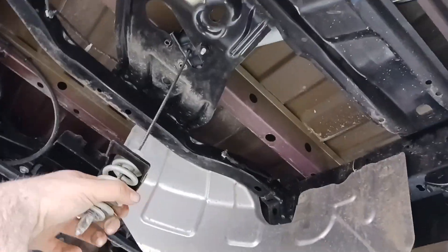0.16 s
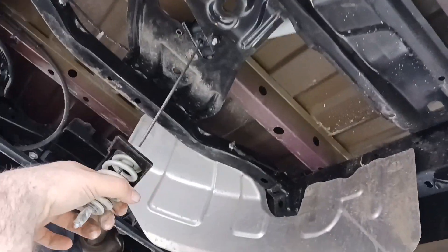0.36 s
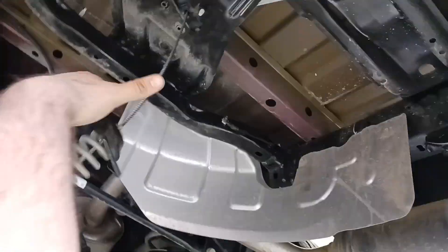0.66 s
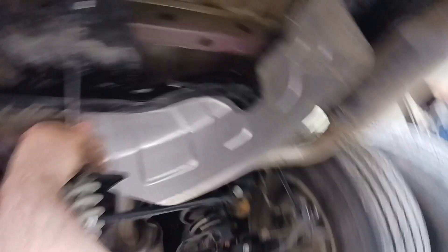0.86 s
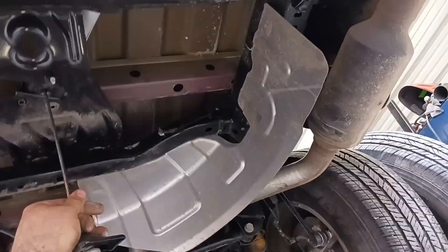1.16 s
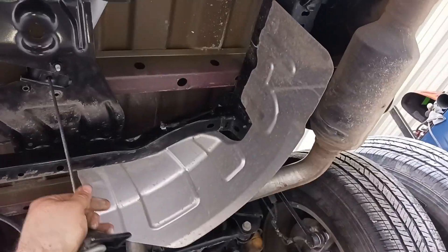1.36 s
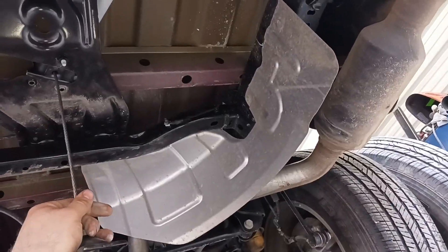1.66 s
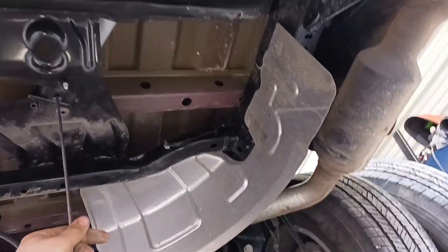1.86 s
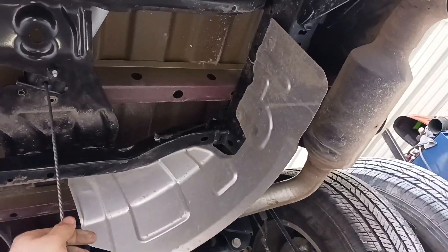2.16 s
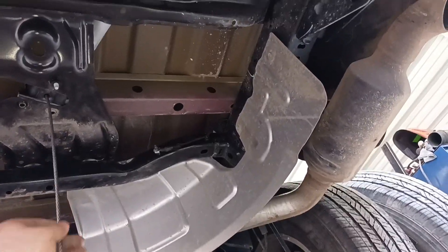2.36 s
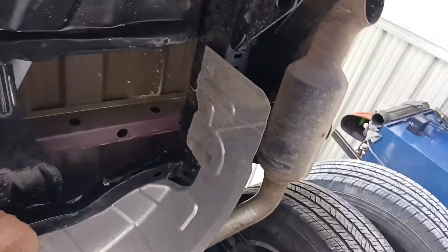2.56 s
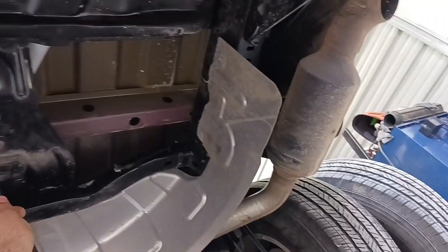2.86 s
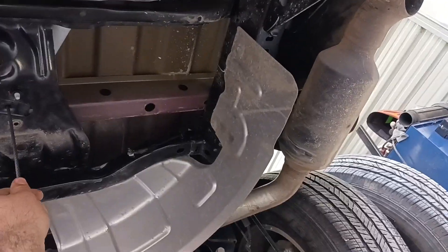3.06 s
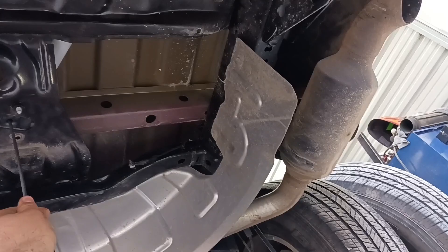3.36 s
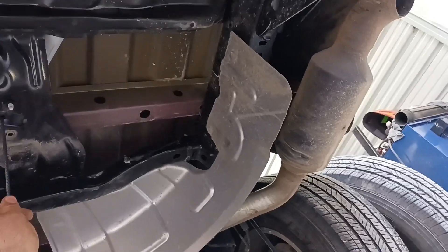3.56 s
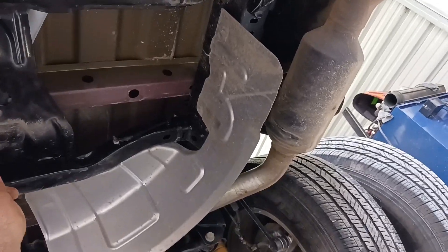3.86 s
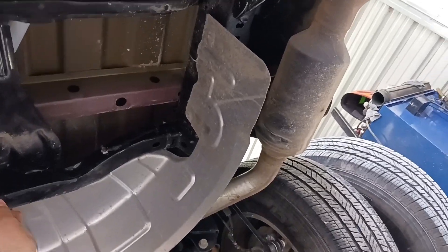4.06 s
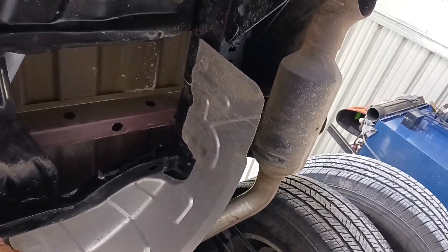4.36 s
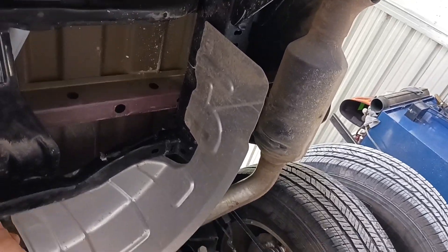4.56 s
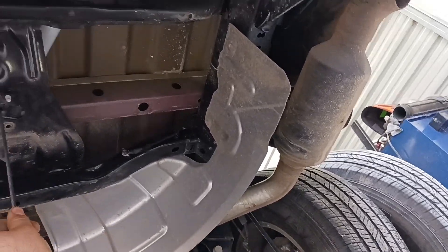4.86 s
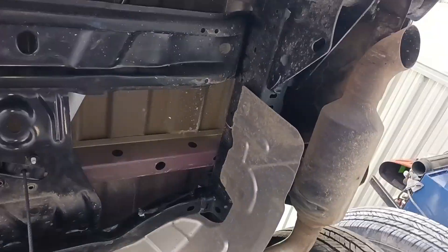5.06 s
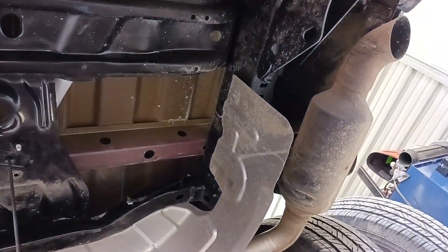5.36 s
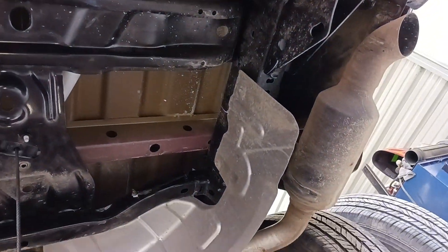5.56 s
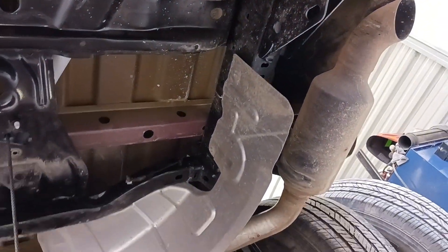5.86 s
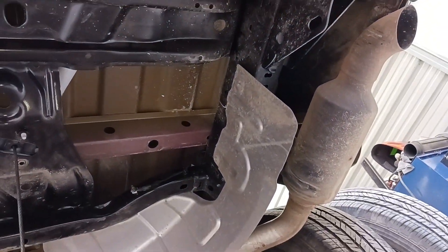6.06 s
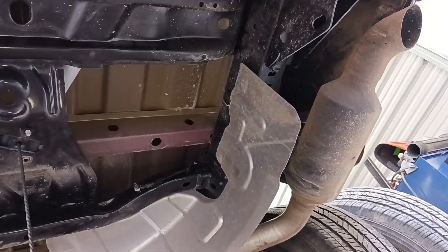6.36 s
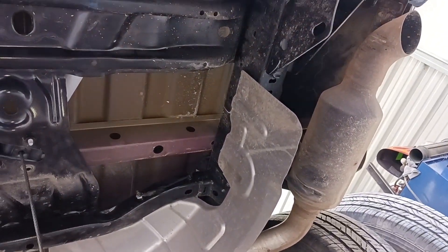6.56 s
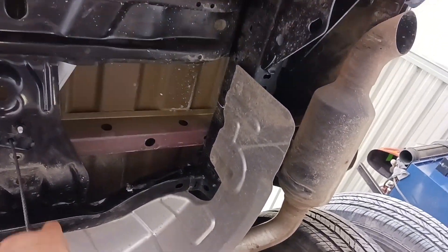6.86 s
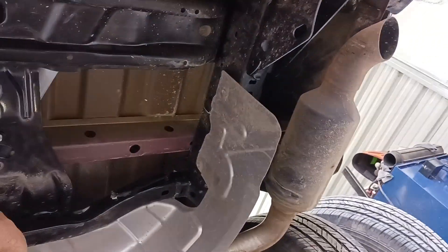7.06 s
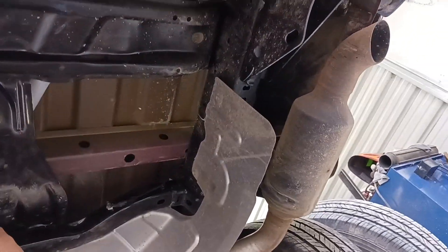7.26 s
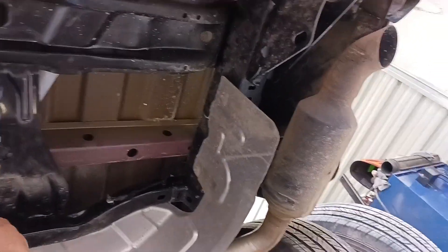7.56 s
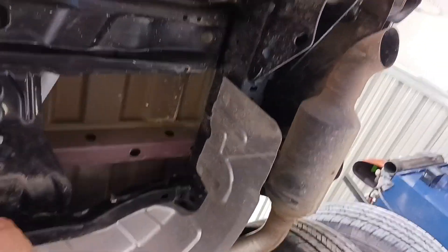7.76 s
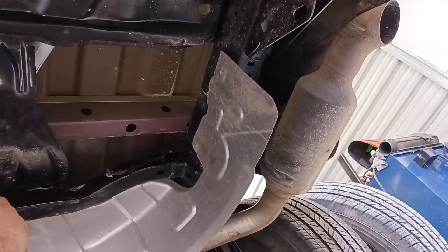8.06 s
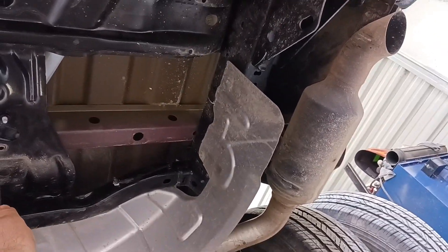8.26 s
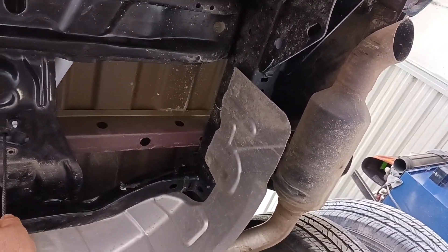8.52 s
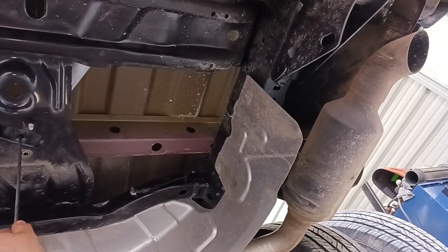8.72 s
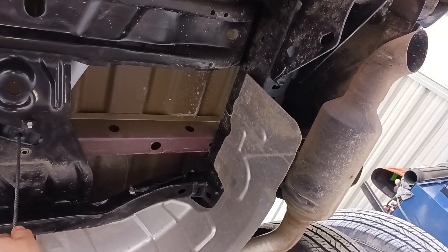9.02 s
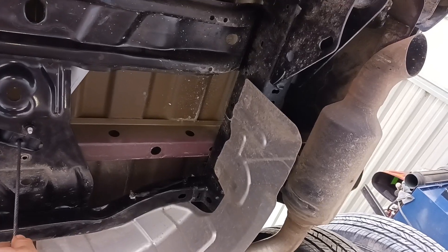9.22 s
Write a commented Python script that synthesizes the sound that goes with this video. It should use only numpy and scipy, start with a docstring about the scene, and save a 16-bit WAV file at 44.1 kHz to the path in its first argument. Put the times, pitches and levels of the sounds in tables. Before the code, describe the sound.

A steel carrier on a cable knocks and chatters under a truck, dense at first then sparser, with a spring ping and a car passing nearby.

```python
"""Cable and steel carrier under a truck bed

A hand tugs the cable of a spare tire winch: its steel carrier knocks and chatters on the frame (noise
bursts through resonators), the truck body booms and the spring pings (decaying sines). The hand rubs
the cable, soft swishes of treble pass and air puffs on one microphone (shaped noise and a pulse).
A car passes on a road nearby (firing tone and noise). A phone listens close by with two microphones."""
import sys
import numpy as np
from scipy import signal
from scipy.fft import rfft, irfft, next_fast_len
from scipy.io import wavfile
from scipy.ndimage import uniform_filter1d, map_coordinates

SR = 44100
rng = np.random.default_rng(int(sys.argv[2]) if len(sys.argv) > 2 else 0)


def file_out(sig):
    """Save sig as 16-bit WAV at sys.argv[1]."""
    # one column per channel
    cols = np.atleast_2d(sig).T
    # limit, then scale
    lim = np.clip(cols, -1, 1)
    pcm = np.round(lim * 32767).astype(np.int16)
    wavfile.write(sys.argv[1], SR, pcm)


N = 414099

# Knocks of the carrier; each layer scales the rise and decay times:
# start_s, thud_db, clank_over_thud_db, rattle_over_thud_db, rise_s, t60_s
KNOCKS = [(0.038, -43.5, -2.5, -13, 0.035, 0.33), (0.101, -35.5, -1.5, -8, 0.004, 0.25),
          (0.148, -43.0, 7, 3.5, 0.0049, 0.078), (0.202, -48.5, 12, 1, 0.011, 0.15),
          (0.262, -42, 3.5, 0, 0.013, 0.1), (0.286, -34.5, 1, -11.5, 0.033, 0.099),
          (0.35, -34.5, -2.0, -18, 0.007, 0.12), (0.414, -45.5, 1.5, -8, 0.0165, 0.13),
          (0.483, -39.5, 5.5, -2.5, 0.013, 0.11), (0.621, -48.5, 8, 12, 0.011, 0.09),
          (0.677, -38.5, -4.5, 9.5, 0.007, 0.076), (0.971, -30.5, -1, -12.5, 0.014, 0.17),
          (1.002, -26, -4, -6.5, 0.0049, 0.15), (1.044, -28.5, -6.5, -5, 0.0066, 0.2),
          (1.071, -32, -9.5, -9, 0.008, 0.25), (1.138, -32.5, -14.5, -18, 0.061, 0.16),
          (1.179, -26.5, 0.5, -9, 0.019, 0.18), (1.224, -20, -3.5, -0.5, 0.019, 0.14),
          (1.315, -35.5, -1, -15, 0.0025, 0.18), (1.371, -31.5, -1, -2, 0.013, 0.09),
          (1.399, -38.5, -4.5, -17.5, 0.027, 0.2), (1.461, -34, -7, -38, 0.012, 0.11),
          (1.531, -26.5, -4, -19.5, 0.04, 0.18), (1.592, -26, -1, -8, 0.025, 0.26),
          (1.672, -24, -14, -35.0, 0.0098, 0.079), (1.712, -29.5, -9, -20.5, 0.013, 0.31),
          (1.789, -39, -6.5, -19, 0.013, 0.15), (1.949, -20.5, -8.5, -10.0, 0.0087, 0.12),
          (1.994, -27, -3.5, -15, 0.012, 0.13), (2.084, -37, -5.0, -11.5, 0.0098, 0.4),
          (2.184, -29.5, -6.5, -16.5, 0.032, 0.13), (2.344, -42.0, -15, -26, 0.012, 0.17),
          (2.392, -26, -3, -10.5, 0.0078, 0.23), (2.411, -21.0, -2, -1, 0.013, 0.13),
          (2.597, -45.5, -14, -27, 0.019, 0.23), (2.772, -28, -4.5, -7, 0.01, 0.14),
          (3.02, -25, -3, -15, 0.023, 0.28), (3.343, -33, -0.5, -10, 0.0188, 0.26),
          (3.719, -34.5, -7.5, -26, 0.025, 0.18), (3.787, -35.5, -5, -21, 0.012, 0.16),
          (3.945, -33.5, -3, -25, 0.018, 0.14), (3.997, -37.0, -20, -27, 0.032, 0.22),
          (4.111, -35.5, -13, -30, 0.035, 0.17), (4.196, -28, -10, -19, 0.022, 0.1),
          (4.257, -37.5, -10.5, -37, 0.01, 0.19), (4.319, -32.5, -9, -25.0, 0.027, 0.15),
          (4.459, -48, -15, -37, 0.01, 0.19), (4.512, -30.5, -13.0, -32.0, 0.042, 0.12),
          (4.598, -36.5, -20, -47, 0.0061, 0.24), (4.701, -43.5, -0.5, -9.5, 0.019, 0.12),
          (4.738, -38.5, -3, -17.5, 0.038, 0.18), (4.842, -45.5, 2, -16.5, 0.0096, 0.16),
          (5.044, -45.5, -2.0, -6, 0.031, 0.21), (5.191, -36.5, -3, -23, 0.013, 0.13),
          (5.262, -39.5, -6.0, -17, 0.024, 0.22), (5.296, -37.5, -10, -26, 0.0206, 0.25),
          (5.337, -28, -3.0, -13, 0.0145, 0.15), (5.432, -39, -13.5, -45.5, 0.0063, 0.088),
          (5.541, -33.5, -7, -17, 0.027, 0.13), (5.577, -40.5, -3, -11, 0.004, 0.38),
          (5.622, -39, 3.5, -11, 0.0084, 0.1), (5.705, -37, -10.5, -34, 0.01235, 0.12),
          (5.779, -48.5, -0.5, -23, 0.0079, 0.22), (5.821, -36, -4, -15, 0.028, 0.12),
          (5.939, -34, -3, -15, 0.025, 0.17), (6.06, -37.5, -5, -25, 0.025, 0.17),
          (6.112, -38.5, -1.5, -16, 0.0121, 0.19), (6.266, -46.5, -15.5, -36, 0.026, 0.66),
          (6.336, -31, 4, -5.5, 0.0087, 0.12), (6.363, -25, -7, -27, 0.0019, 0.22),
          (6.389, -35.5, -2.0, -11.5, 0.0032, 0.19), (6.501, -53.5, -3.5, -44, 0.0089, 0.14),
          (6.574, -36.5, -5.5, -22.5, 0.0305, 0.14), (6.659, -29, -8, -17, 0.0104, 0.13),
          (7.016, -49.5, -21, -28, 0.0366, 0.12), (7.063, -34, -0.5, -14.5, 0.025, 0.13),
          (7.259, -41, -4, -19.5, 0.0234, 0.1), (7.491, -34, -19.5, -44, 0.0145, 0.087),
          (7.725, -35.5, -5.5, -17.5, 0.0177, 0.1), (7.798, -36.5, -13, -29, 0.027, 0.28),
          (7.853, -33.5, -4.5, -20, 0.00292, 0.15), (7.941, -36, -7.5, -18.5, 0.013, 0.17),
          (8.013, -43, -11.5, -29, 0.0081, 0.057), (8.102, -33.5, -7, -21.5, 0.035, 0.09),
          (8.165, -35, 6, 3.5, 0.015, 0.12), (8.313, -46.5, -10.5, -13, 0.036, 0.13),
          (8.358, -42.5, -10.0, -17, 0.04, 0.15), (8.425, -46.5, -17, -37, 0.014, 0.17),
          (8.656, -39.5, -7.5, -14, 0.017, 0.12), (8.7, -41.5, 0, -5, 0.01, 0.25),
          (8.771, -29, 1, -12.5, 0.025, 0.15), (8.96, -47, -2.5, -21, 0.0221, 0.14),
          (9.004, -35.0, -2.5, -7.5, 0.012, 0.11), (9.211, -39, -4, -13, 0.0193, 0.15),
          (9.245, -41, -6, -18.5, 0.0049, 0.13), (9.312, -46.5, -2, -6, 0.044, 0.14),
          (9.344, -32.0, -7, -21, 0.035, 0.092)]
# Resonances of frame and bed floor: centre_hz, width_hz, level_db
FRAME_MODES = [(78, 23, -8), (122, 26.2, -0.5), (165, 32.2, -1.5), (222.9, 22, -1), (261.3, 26, -4),
               (377.8, 42.4, -11.5)]
# Resonances of the heat shield: centre_hz, width_hz, level_db
SHIELD_MODES = [(437.6, 50.7, 8), (518.7, 93, 4), (632, 43, 5), (722, 64, 1), (846.4, 37.5, 4.5),
                (1020, 99, -1), (1204, 54.5, 2), (1401, 122, -1.5), (1647, 210, -4.5), (1990, 240, -5),
                (2550, 320, -9.5)]
# Resonances of small loose parts: centre_hz, width_hz, level_db
PARTS_MODES = [(2967, 566, 2), (4050, 2200, -3.5), (5700, 820, -2), (6294, 710, -8.5), (7400, 550, -14)]
# Resonances of the finest grit: centre_hz, width_hz, level_db
GRIT_MODES = [(10300, 500, -6.5), (12400, 1200, -1), (14600, 1600, 0)]
# Spring pings: start_s, short_modes_db, long_modes_db, attack_s
PINGS = [(.619, -33, -32.5, 0.0096), (.678, -15.5, -25.5, 0.0035), (.715, -38.5, -21, .012)]
# Short modes of the spring: pitch_hz, level_db, t60_s
SHORT_MODES = [(2570, -2, 0.055), (4180, 7.5, 0.046), (6080, -2, 0.039), (1190, -20, 0.0589)]
# Long modes of the spring: pitch_hz, level_db, t60_s
LONG_MODES = [(3710, 2, 0.11), (2473, -6.5, 0.13), (7200, -11.5, 0.18), (4100, -8.5, .1)]
# The hand slides up the cable: time_s, scrape_db, sizzle_db
SLIDE = [(.69, -46, -49.5), (.77, -35.5, -37.5), (.825, -36, -45.5), (.855, -40, -42.5), (.888, -30.5, -33),
         (.92, -55.5, -34), (.95, -63.5, -50.5)]
# Relative spectrum of the scrape: frequency_hz, density_db_per_hz
SCRAPE_SPECTRUM = [(240, -30), (450, 0.5), (1300, -7.5), (2100, -12), (3400, -13), (5000, -16.5),
                   (8000, -40)]
# Relative spectrum of the sizzle: frequency_hz, density_db_per_hz
SIZZLE_SPECTRUM = [(1500, -21), (3500, -9), (5900, 1), (8900, -15), (10900, -9), (14000, 2.5),
                   (16000, -12.5)]
# Short soft swishes, before their edges are smoothed: start_s, end_s, level_db
SWISHES = [(0.531, 0.587, -53.5), (1.862, 1.883, -58.5), (2.623, 2.641, -54), (4.9, 4.998, -57),
           (6.912, 6.974, -51.5), (7.539, 7.599, -59), (7.63, 7.671, -66.5)]
# Relative spectrum of the swishes: frequency_hz, density_db_per_hz
SWISH_SPECTRUM = [(500, -30), (1470, -8), (2500, -7.5), (2700, -6), (3630, -6), (7830, -7.5), (9220, -18),
                  (12900, -4), (16000, -15.5)]
# Background levels: time_s, engine_drone_db, tyre_roar_db, hiss_db
ROAD = [(0.0, -61, -64.5, -70.5), (0.31, -52, -49, -77), (0.57, -51, -59, -72.5), (0.83, -43, -54.5, -55.5),
        (1.28, -50, -54, -76), (2.25, -57.5, -59.5, -77.5), (2.7, -48, -48.5, -70.5),
        (3.2, -41, -31, -65.5), (3.45, -37.5, -30, -60.5), (3.62, -39, -42, -72),
        (3.95, -37.5, -46.5, -73.5), (5.1, -58.5, -58.5, -77.5), (5.86, -65.5, -61.5, -76.5),
        (6.33, -59, -71, -89), (6.75, -63, -61, -70.5), (7.4, -69.5, -70, -76.5), (7.85, -58, -62.5, -71),
        (8.47, -68.5, -67, -83.5), (9.15, -63.5, -65.5, -83), (9.39, -46, -57, -80.5)]
# Firing tone of the passing car: time_s, pitch_hz, level_db
ENGINE = [(3.1, 60, -53), (3.47, 59, -31.5), (3.55, 58.4, -52), (3.62, 59.2, -29.5), (3.78, 62.8, -44.5),
          (3.88, 62.6, -27.5), (4.05, 69.4, -36.5), (4.3, 71.5, -43), (4.7, 70.4, -58)]
# Relative spectrum of drone, body boom and cable rumble: frequency_hz, density_db_per_hz
LOW_SPECTRUM = [(18, -38), (30, -15.5), (60, -3), (90, -4.5), (180, -9.5), (400, -21), (800, -72.5)]
# Relative spectrum of the tyre roar: frequency_hz, density_db_per_hz
ROAR_SPECTRUM = [(120, -32), (200, -4), (355, -4.5), (581, -4.5), (839, -1), (983, -3.5), (1540, -8.5),
                 (2640, -23), (6140, -32), (9000, -48.5), (11700, -78.5), (19800, -120)]
# Relative spectrum of the far hiss: frequency_hz, density_db_per_hz
HISS_SPECTRUM = [(2000, -42), (3500, -10.5), (6000, -3.5), (8000, -6.5), (10000, -9.5), (13300, 3.5),
                 (16000, -11)]
# Puff of air on the right microphone: time_s, peak_db, width_s
PUFF = (1, -19, 0.0068)
# Phase by which the left microphone leads: frequency_hz, lead_rad
LEFT_LEAD = [(0, 0), (340, .3), (1030, 3.6), (2670, 9.6), (5000, 13.7), (11000, 40), (16000, 29)]
# Level of the left microphone over the right: frequency_hz, difference_db
LEFT_LEAN = [(60, 0), (110, -5), (200, -6), (380, -8), (700, -2), (1290, 7.5), (2380, 7), (4400, -3),
             (8120, 7), (11500, 4.5), (16000, -2.5)]
# Likeness of left and right: frequency_hz, likeness_0_to_1
LIKENESS = [(60, 0.85), (150, 1), (300, 0.81), (600, 0.42), (1400, 0.22), (2500, 0.2), (4500, 0.2),
            (8000, 0.11)]

GRIT_DB, GRIT_DB_PER_DB = -7.5, 1.25  # the grit grows faster than the rattle
BOOM_DB, BOOM_RISE_S, BOOM_T60_S = -7, 0.024, 0.4  # level is over the thud
RUMBLE_DB = -4  # rumble of the rubbed cable over its scrape
TOP_HZ = 15900  # band limit of the phone


def amp(db):
    """Decibels to amplitude ratio: twenty decibels are a factor of ten."""
    return 10 ** (np.asarray(db) / 20)


def unit(x):
    """Normalisation to an rms of 1."""
    return x / np.sqrt(np.mean(x ** 2) + 1e-20)


def along(points, hz):
    """Linear interpolation of (frequency, value) points on a logarithmic frequency axis."""
    frequency, value = np.transpose(points)
    return np.interp(np.log(hz + 1), np.log(frequency + 1), value)


def curves(rows):
    """Linear interpolation in time: one curve for each column after the time."""
    time, *columns = np.transpose(rows)
    return [np.interp(np.arange(N) / SR, time, column) for column in columns]


def wobble(rate):
    """Slow random modulation: a spline through random knots, rate knots a second."""
    knots = rng.standard_normal(int(N * rate / SR) + 4)
    return map_coordinates(knots, [np.arange(N) * rate / SR])


def smooth_twice(x, size):
    """Low-pass smoothing by two moving averages of size samples."""
    return uniform_filter1d(uniform_filter1d(x, size=size), size=size)


def filtered(x, response):
    """Linear filtering: the spectrum of x times a complex response of frequency."""
    m = next_fast_len(x.shape[-1] + SR // 4)
    spectrum = rfft(x, m) * response(np.fft.rfftfreq(m, 1 / SR))
    return irfft(spectrum, m)[..., :x.shape[-1]]


def rush(spectrum, patchy_db):
    """Coloured noise: two unrelated signals of joint rms 1 share patches of random gain."""
    cells = signal.stft(rng.standard_normal((2, N)), nperseg=512)[2]
    field = uniform_filter1d(rng.standard_normal(cells.shape[1:]), 6, 0)  # over frequency
    field = uniform_filter1d(field, 8, 1)  # over time
    pair = signal.istft(cells * amp(patchy_db * unit(field)), nperseg=512)[1][:, :N]
    return unit(filtered(pair, lambda hz: amp(along(spectrum, hz))))


def resonant_body(hz, modes, gains_db):
    """Modal resonance: band-pass modes of alternating sign, with new strengths for each knock."""
    total = 0
    for k, (centre, width, db) in enumerate(modes):
        damping = 1j * hz * width
        strength = (-1) ** k * amp(db + gains_db[:, k, None])
        total = total + strength * damping / (centre ** 2 - hz ** 2 + damping)
    return total


def chatter(modes, level_db, quick, stretch, step_db, grain_db, spread_db):
    """Repeated contact: each knock is a burst with lead-in, sudden start, swell and fall, rung by a body."""
    start_s, rise, t60 = np.transpose(KNOCKS)[[0, 4, 5], :, None]
    lead = SR // 20
    t = (np.arange(SR // 4) - lead) / SR

    # Level swells from step_db to 0 dB at the top, then falls
    top = rise * quick
    swell_db = step_db * (1 - t / top)
    fall_db = -60 * (np.abs(t - top) / (t60 * stretch)) ** 1.03
    blow = amp(np.where(t < top, swell_db, fall_db))
    onset = 1 - np.exp(-(np.clip(t, 0, None) / 0.0028) ** 2)
    lead_in = amp(step_db - 10 + 60 * np.clip(t, None, 0) / 0.056)
    envelope = blow * onset + (1 - onset) * lead_in

    # Random gain on two time scales makes single contacts and their bunches
    size = (len(start_s), len(t))
    lumps = unit(uniform_filter1d(rng.standard_normal(size), size=64))
    bunches = unit(uniform_filter1d(rng.standard_normal(size), size=300))
    push = envelope * amp(grain_db * lumps + 1.6 * bunches) * rng.standard_normal((2, *size))
    gains_db = rng.normal(0, spread_db, (len(start_s), len(modes)))
    rung = filtered(push, lambda hz: resonant_body(hz, modes, gains_db))

    # Scale each burst by the energy its envelope carries
    energy_root = np.linalg.norm(envelope, axis=1)[:, None]
    rung *= amp(level_db)[:, None] * energy_root / np.linalg.norm(rung, axis=2, keepdims=True)
    out = np.zeros((2, N + SR))
    for k, at in enumerate(np.round(start_s[:, 0] * SR).astype(int)):
        out[:, at:at + len(t)] += rung[:, k]
    return out[:, lead:lead + N]


def carrier():
    """Impact on coupled bodies: small parts answer first, the heavy frame builds up later and rings on."""
    _, thud_db, clank_db, rattle_db, _, _ = np.transpose(KNOCKS)
    grit_db = GRIT_DB + GRIT_DB_PER_DB * (thud_db + rattle_db)
    thud = chatter(FRAME_MODES, thud_db,
                   quick=1.05, stretch=0.86, step_db=-4, grain_db=2.5, spread_db=3)
    clank = chatter(SHIELD_MODES, thud_db + clank_db,
                    quick=0.91, stretch=0.8, step_db=-4, grain_db=3, spread_db=2.5)
    rattle = chatter(PARTS_MODES, thud_db + rattle_db,
                     quick=0.85, stretch=0.65, step_db=-6.5, grain_db=2, spread_db=1)
    grit = chatter(GRIT_MODES, grit_db,
                   quick=0.77, stretch=0.69, step_db=-5.5, grain_db=2.0, spread_db=1.5)
    return thud + clank + rattle + grit


def boom():
    """Energy build-up and decay: the truck body rumbles under every knock and dies slowly."""
    start_s, thud_db, _, _, rise, _ = np.transpose(KNOCKS)
    t = np.arange(SR // 2) / SR
    at = np.round(np.abs(start_s + rise - BOOM_RISE_S) * SR).astype(int)
    blow_power = np.bincount(at, amp(thud_db + BOOM_DB) ** 2, minlength=N)
    swell = (1 - np.exp(-(t / BOOM_RISE_S) ** 2)) * amp(-60 * t / BOOM_T60_S)
    power = np.abs(signal.fftconvolve(blow_power, swell ** 2)[:N])  # powers of overlapping booms add
    return np.sqrt(power) * rush(LOW_SPECTRUM, patchy_db=2.5)


def spring():
    """Damped modal vibration: touching coils ring in steel modes, roughened as the spring rattles on."""
    out = np.zeros((2, N))
    t = np.arange(SR // 4) / SR
    quarter_turn = np.array([[0], [0.25]])  # cycles between the two versions
    for start_s, short_db, long_db, attack in PINGS:
        onset = 1 - np.exp(-(t / attack) ** 2)
        for db, modes in ((short_db, SHORT_MODES), (long_db, LONG_MODES)):
            for hz, level_db, t60 in modes:
                swing, bend = unit(smooth_twice(rng.standard_normal((2, len(t))), 220))
                decay = amp(db + level_db + 2.9 * swing - 60 * t / t60)
                cycles = hz * t + 0.092 * bend + quarter_turn
                ring = decay * np.sin(2 * np.pi * cycles)
                out[:, round(start_s * SR):][:, :len(t)] += ring * onset
    return out


def hand():
    """Friction noise: skin rubs along the strands and shakes the cable."""
    t = np.arange(N) / SR
    sliding = (t > SLIDE[0][0]) & (t < SLIDE[-1][0])
    scrape_db, sizzle_db = curves(SLIDE)
    rumble = amp(RUMBLE_DB) * rush(LOW_SPECTRUM, patchy_db=-1.5)
    scrape = rush(SCRAPE_SPECTRUM, patchy_db=1.5) + rumble
    sizzle = rush(SIZZLE_SPECTRUM, patchy_db=4.5)
    return sliding * (amp(scrape_db + 1.5 * wobble(53)) * scrape + amp(sizzle_db) * sizzle)


def swishes():
    """Gated noise: brief soft puffs of treble with smoothed edges."""
    t = np.arange(N) / SR
    gate = sum(amp(db) * ((t > start) & (t < end)) for start, end, db in SWISHES)
    return smooth_twice(gate, 700) * rush(SWISH_SPECTRUM, patchy_db=1.7)


def puff():
    """Pressure pulse: one low push on the right microphone with a dip on either side."""
    time, peak_db, width = PUFF
    u = ((np.arange(N) / SR - time) / width) ** 2
    return np.outer([0, 1], amp(peak_db) * (1 - u) * np.exp(-u / 2))


def road():
    """Periodic firing and broadband noise: engine tone and drone, tyre roar and a far hiss, all fluttering."""
    drone_db, roar_db, hiss_db = curves(ROAD)
    hz, tone_db = curves(ENGINE)
    flutter_db = 1.5 * wobble(9.8)
    phase = 2 * np.pi * np.cumsum(hz) / SR + 0.3 * wobble(12)
    tone = amp(tone_db + 2.2 * wobble(22)) * np.sin(phase)
    drone = amp(drone_db + flutter_db) * rush(LOW_SPECTRUM, patchy_db=0.5)
    roar = amp(roar_db + flutter_db) * rush(ROAR_SPECTRUM, patchy_db=2.1)
    hiss = amp(hiss_db + 1.5 * wobble(42)) * rush(HISS_SPECTRUM, patchy_db=1.0)
    return tone + drone + roar + hiss


def two_microphones(shared, other):
    """Interchannel coherence: a shared sound with lag and level difference, plus one of opposite sign."""
    side = np.array([[0.5], [-0.5]])  # left, right

    def mix_angle(hz):
        """Coherence as an angle: its double has the likeness as cosine."""
        return np.arccos(np.clip(along(LIKENESS, hz), 0, 1)) / 2

    def port(hz):
        """Transfer function: each microphone takes half the level difference and half the phase lead."""
        lead = np.interp(hz, *np.transpose(LEFT_LEAD))
        return amp(side * along(LEFT_LEAN, hz)) * np.exp(1j * side * lead)

    alike = filtered(shared, lambda hz: port(hz) * np.cos(mix_angle(hz)))
    unlike = filtered(other, lambda hz: 2 * side * port(hz) * np.sin(mix_angle(hz)))
    return alike + unlike


def scene():
    """Superposition: the two versions of every source add up before they reach the microphones."""
    shared, other = carrier() + boom() + spring() + hand() + swishes() + road()
    return two_microphones(shared, other) + puff()


def record(dry):
    """Band limitation: the phone keeps nothing above its band limit."""
    return filtered(dry, lambda hz: hz < TOP_HZ)


dry = scene()
out = record(dry)
file_out(out)
```